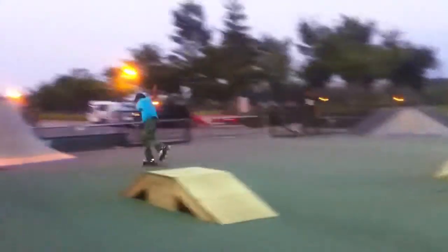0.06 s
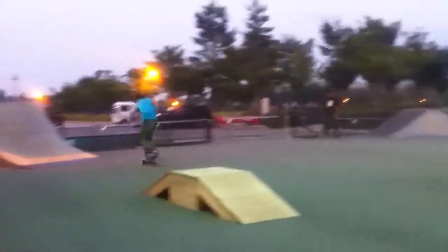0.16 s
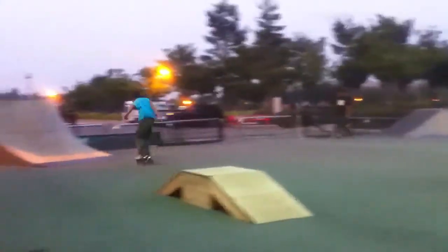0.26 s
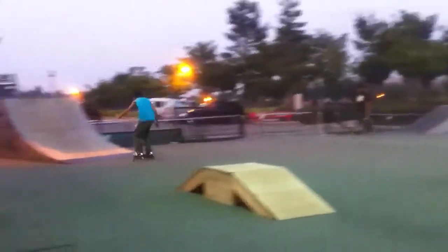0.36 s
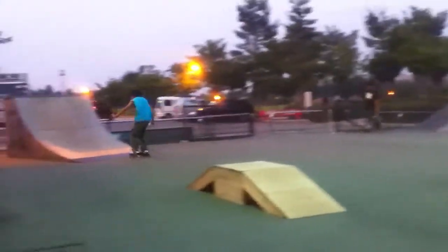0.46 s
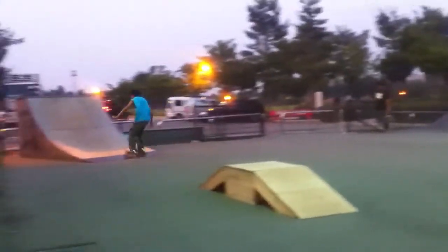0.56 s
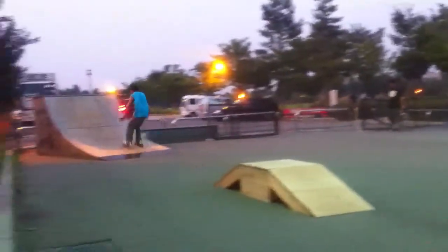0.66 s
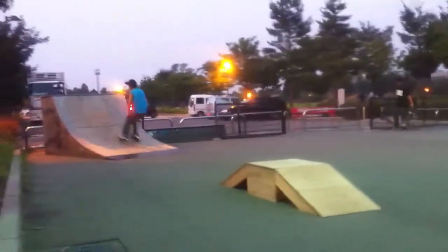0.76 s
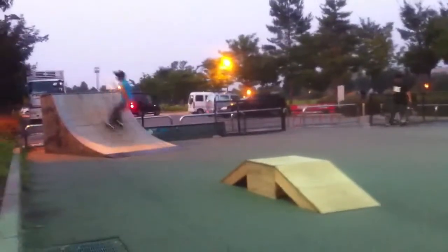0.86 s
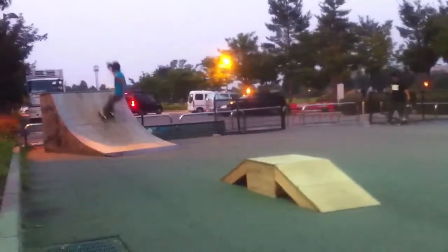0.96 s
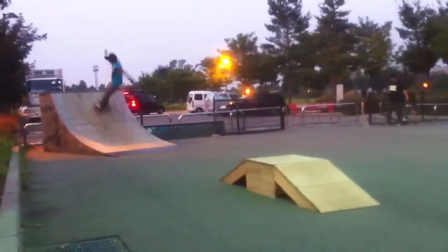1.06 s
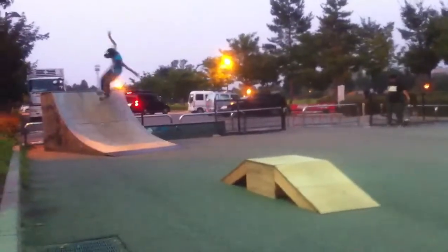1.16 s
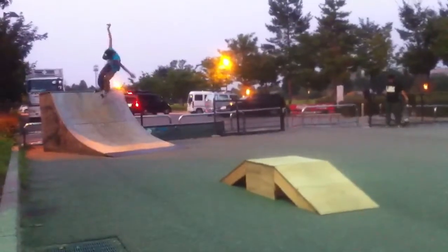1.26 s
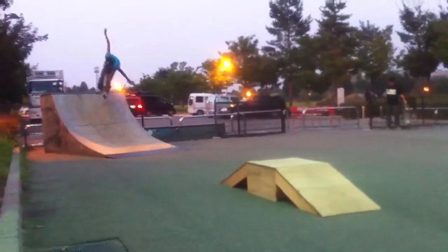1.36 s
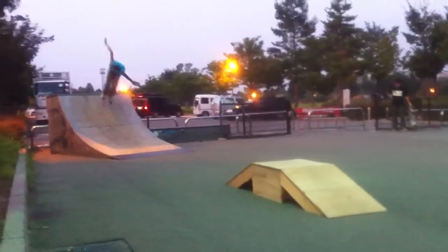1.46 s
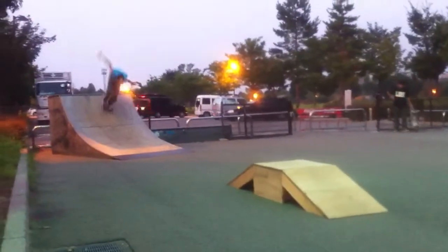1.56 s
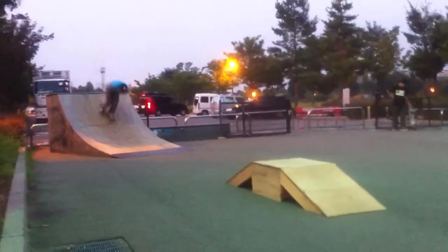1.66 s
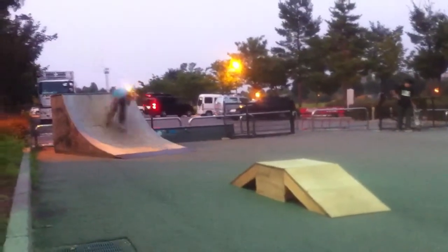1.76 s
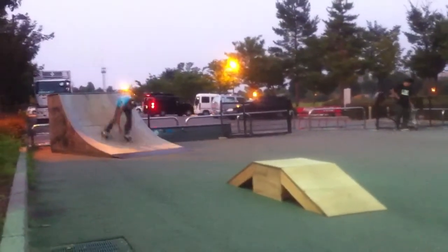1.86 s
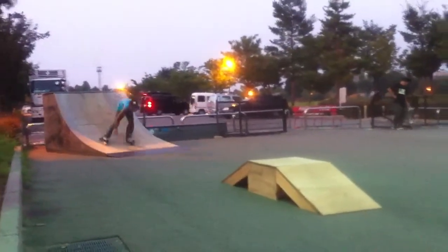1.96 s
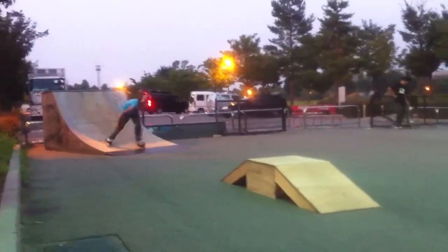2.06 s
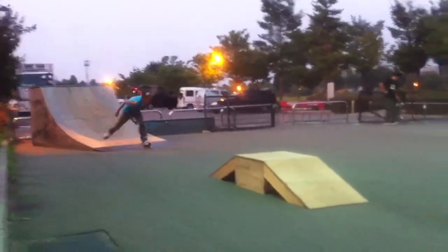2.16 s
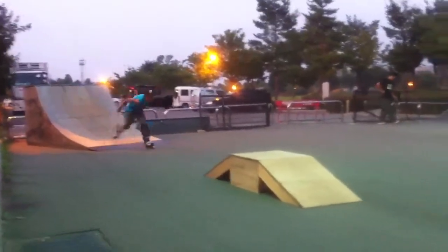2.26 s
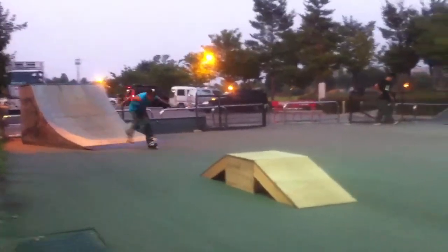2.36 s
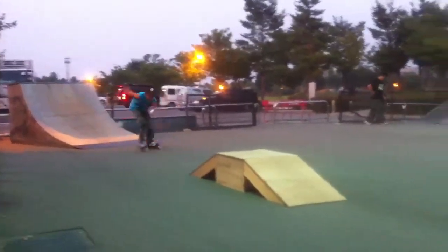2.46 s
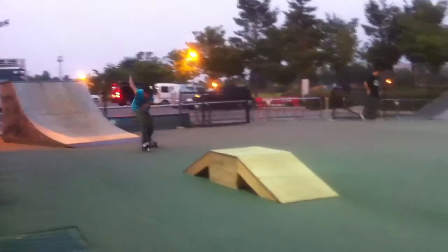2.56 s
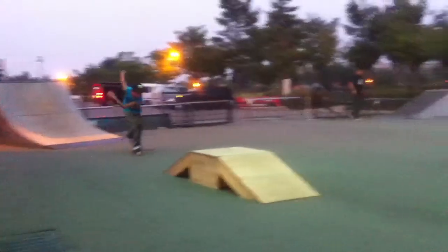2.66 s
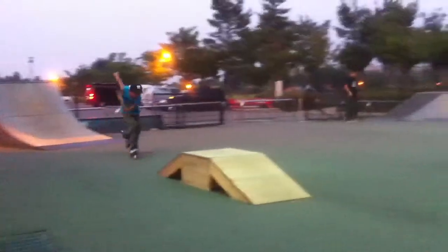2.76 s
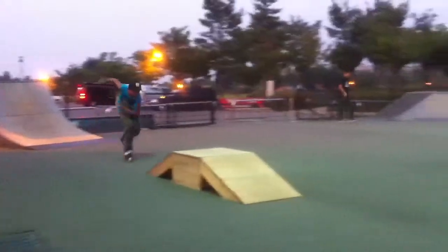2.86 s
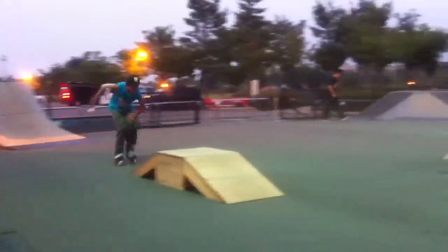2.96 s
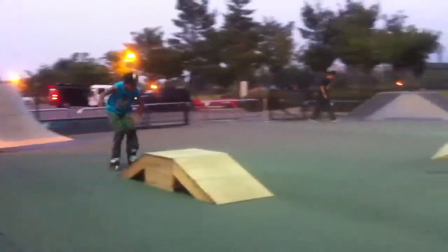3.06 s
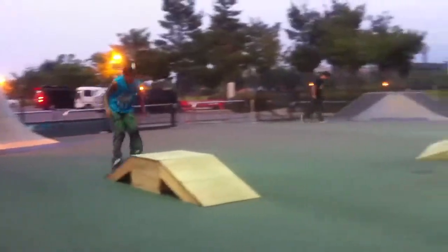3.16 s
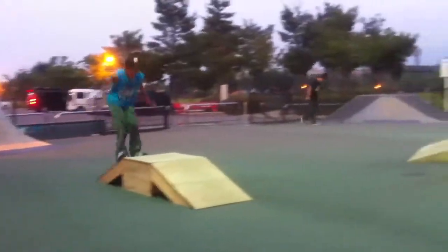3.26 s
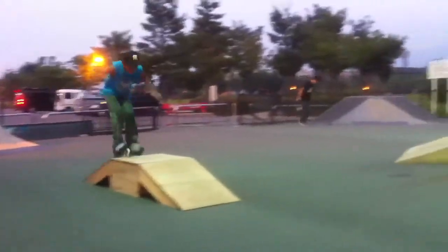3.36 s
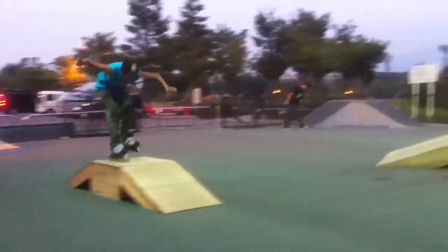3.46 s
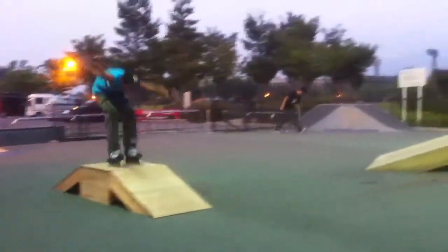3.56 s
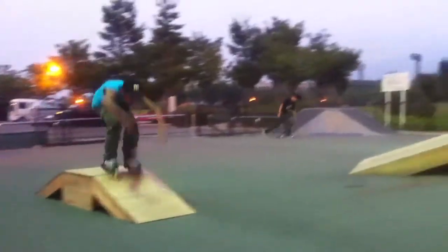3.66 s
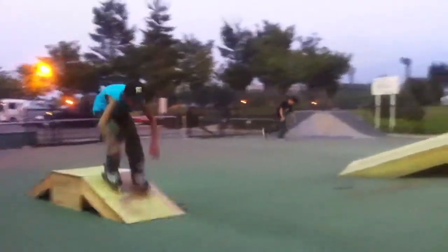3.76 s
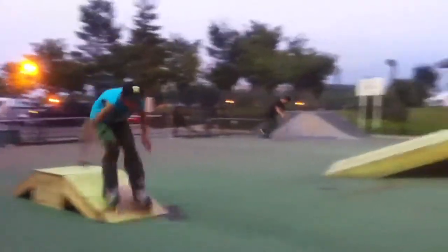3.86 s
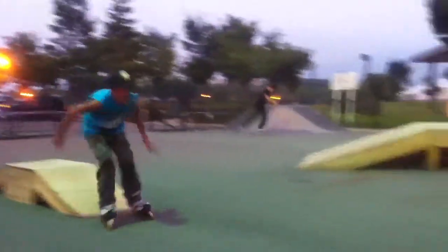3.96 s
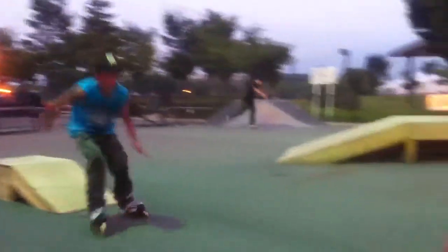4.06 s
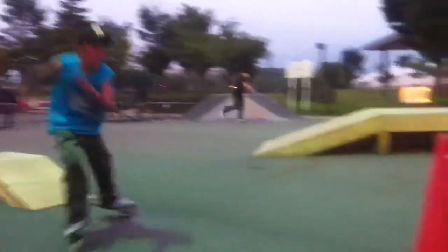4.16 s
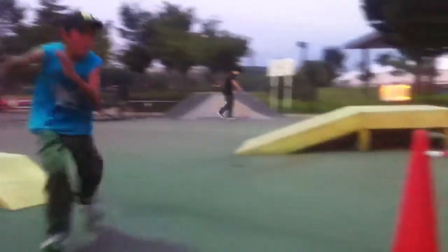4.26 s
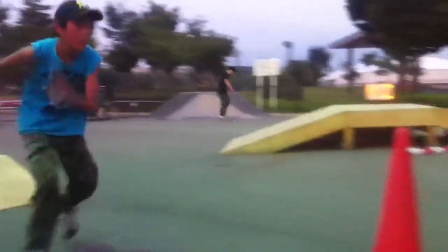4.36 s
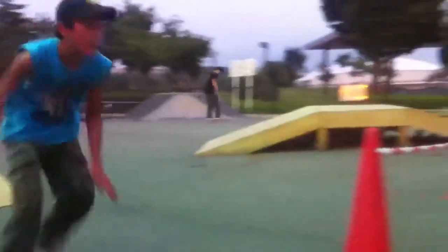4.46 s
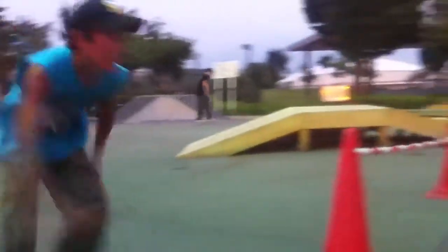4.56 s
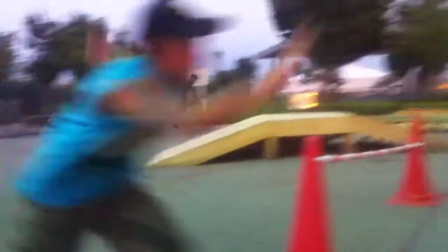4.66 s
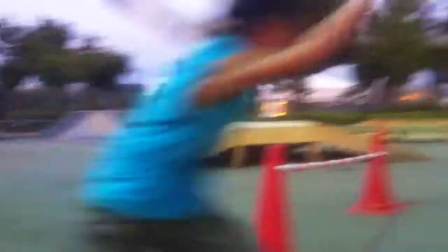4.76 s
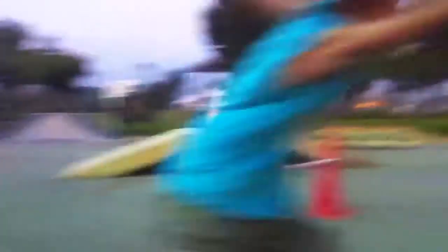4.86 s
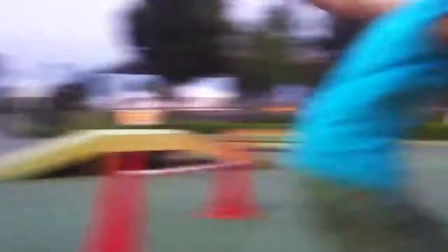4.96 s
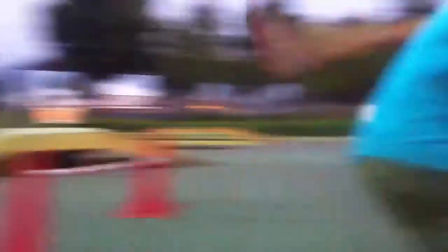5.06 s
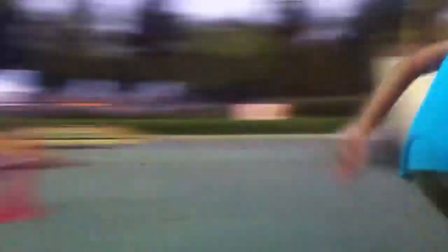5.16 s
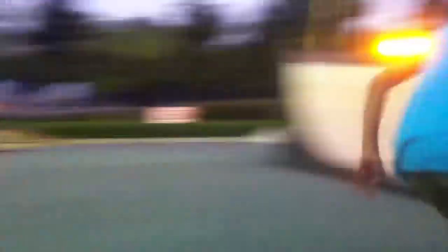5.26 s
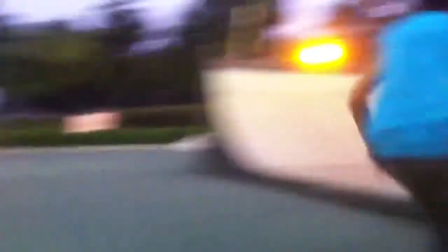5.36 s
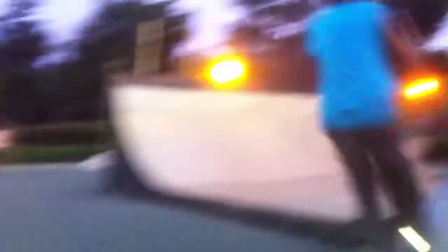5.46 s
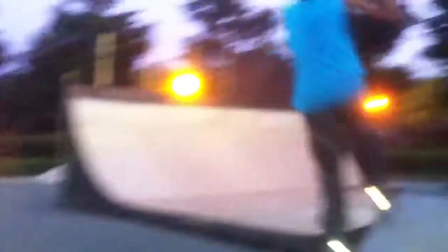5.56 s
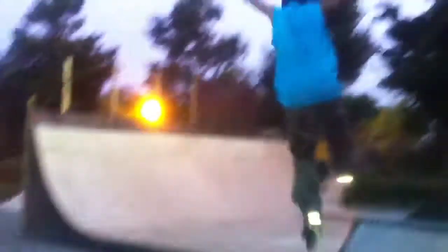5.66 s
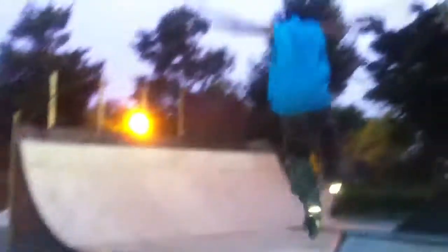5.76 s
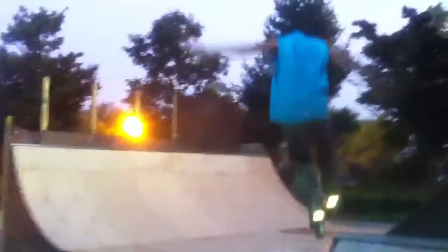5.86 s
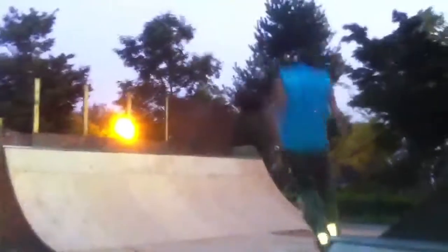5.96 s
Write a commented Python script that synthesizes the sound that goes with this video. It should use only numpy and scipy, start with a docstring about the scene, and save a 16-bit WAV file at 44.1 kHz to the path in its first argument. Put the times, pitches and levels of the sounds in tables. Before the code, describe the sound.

Hard skate wheels roar and clack through an outdoor skate park, drumming over plywood and clanging on steel plates, with faint traffic behind.

```python
"""Distant traffic hums as a skater rolls in, hard wheels roaring and hissing on an outdoor park's asphalt.
At 0.6 s they clash over a steel foot plate and drum up a far, hollow quarter pipe; the skater lands
back on it at 1.7 s and skids off. At 3.2 s the skates thump onto a plywood box and drum across it.
They clack close past the microphone near 5 s, then hit a second ramp's steel plate at 5.3 s;
that ramp booms and rattles while the wheels scrape to brake."""
import sys
import numpy as np
from scipy import signal
from scipy.fft import rfft, irfft
from scipy.io import wavfile

SR = 44100
rng = np.random.default_rng(int(sys.argv[2]) if len(sys.argv) > 2 else 0)


def file_out(sig):
    """Save sig as 16-bit WAV at sys.argv[1]."""
    # one column per channel
    cols = np.atleast_2d(sig).T
    # limit, then scale
    lim = np.clip(cols, -1, 1)
    pcm = np.round(lim * 32767).astype(np.int16)
    wavfile.write(sys.argv[1], SR, pcm)


N = 264688
TIME = np.arange(N) / SR


def amp(db):
    """Decibels to gain."""
    return 10 ** (np.asarray(db) / 20)


def unit(x):
    """Scales to rms 1."""
    return x / np.sqrt(np.mean(x ** 2) + 1e-20)


def read(points, hz):
    """Reads a curve on a log-frequency axis."""
    f, value = np.transpose(points)
    return np.interp(np.log(hz + 1), np.log(f + 1), value)


def fader(rows):
    """Gain over time from a curve in dB."""
    return amp(np.interp(TIME, *np.transpose(rows)))


def held(start, end, attack_s, fade_db_per_s):
    """An envelope that rises from start, holds until end and then fades."""
    return np.clip((TIME - start) / attack_s, 0, 1) * amp(-fade_db_per_s * np.maximum(TIME - end, 0))


def add(mix, s, sound):
    """Mixes a sound in at time s."""
    part = mix[max(round(s * SR), 0):][:len(sound)]
    part += sound[:len(part)]


def colour(x, spectrum, peaks=(), ripple_db=0):
    """An EQ curve that rolls off past its ends, with set resonances and a ripple of lesser ones; rms 1."""
    hz = np.fft.rfftfreq(len(x), 1 / SR) + 1
    octaves_out = abs(np.log2(hz / np.clip(hz, spectrum[0][0], spectrum[-1][0])))
    db = read(spectrum, hz) - 20 * octaves_out
    mode_hz = np.arange(500, 16000, 75)
    db += ripple_db * np.interp(hz, mode_hz, rng.standard_normal(len(mode_hz)), left=0)
    for centre, width, peak_db in peaks:
        db += peak_db / (1 + (2 * (hz - centre) / width) ** 2)
    return unit(irfft(rfft(x) * amp(db), len(x)))


def grains(per_s, spread_db):
    """A random train of tiny contacts; a positive spread hardens a few, a negative one softens them."""
    size = amp(spread_db * np.minimum(rng.exponential(1, N), 4))
    return size * rng.standard_normal(N) * (rng.random(N) < per_s / SR)


def waver(hz, depth_db):
    """A random gain that moves up to hz times a second."""
    slow = np.fft.rfftfreq(N, 1 / SR) < hz
    return amp(depth_db * unit(irfft(rfft(rng.standard_normal(N)) * slow, N)))


def strike(spectra, dbs, t60, rise_s, crack, crack_s, bass_ring=1, peaks=()):
    """A blow on crowded modes: a short crack, then three bands die away, the lowest on its own time."""
    t = TIME[:2 ** 15]
    out = np.zeros(len(t))
    attack = (1 + crack * np.exp(-t / crack_s)) * (1 - np.exp(-t / rise_s))
    for spectrum, db, share in zip(spectra, dbs, (bass_ring, 1, 1)):
        fade = attack * amp(db - 60 * t / max(t60 * share, .005))
        modes = fade * colour(rng.standard_normal(len(t)), spectrum, peaks, ripple_db=3.5)
        out += unit(modes) * np.sqrt(np.mean(fade ** 2))  # the force of the blow sets its energy
    return out


def ring(blows, modes, rise_s):
    """Each blow rings the same set of modes at its own pitch."""
    out, t = np.zeros(N), TIME[:2 ** 14]
    for s, db, hz, t60 in blows:
        tone = np.zeros(len(t))
        for k, (ratio, mode_db, share) in enumerate(modes):
            fade = amp(db + mode_db - 60 * t / (t60 * share))
            tone += (-1) ** k * fade * np.sin(2 * np.pi * hz * ratio * t)
        add(out, s, tone * (1 - np.exp(-t / rise_s)))
    return out


# EQ of the road wash: f/Hz, level/dB
ROAD_EQ = [(15, -58), (25, -43), (59, -26), (135, -2.5), (213, -0.5), (326, -7.5), (450, -7.5), (879, -7),
           (1150, -13), (1720, -17), (2630, -25), (3260, -24), (9270, -31), (15000, -34.5)]
# fader moves on a distant engine: t/s, level/dB
ENGINE_FADER = [(0, -59.5), (1, -64), (1.45, -49), (2.7, -54.5), (3.1, -72), (6, -63)]

def traffic(engine_hz=212.3):
    """The background bed: a far road's wash and one engine's low, wavering hum."""
    wash = amp(-52) * colour(rng.standard_normal(N), ROAD_EQ) * waver(hz=9.8, depth_db=-2.2)
    hum = fader(ENGINE_FADER) * np.sin(2 * np.pi * engine_hz * TIME) * waver(hz=10, depth_db=0.5)
    return wash + hum


# the park's reverb time: f/Hz, t60/s
PARK_DECAY = [(150, 0.3), (1000, 0.3), (5000, 0.52), (14000, 0.098)]

def park_echoes(x, echoes_per_s=1500, predelay_s=0.012):
    """Thin echoes from ramps, fences and trees; the top end dies first."""
    n = 2 ** 15
    taps = rng.standard_normal(n) * (rng.random(n) < echoes_per_s / SR) * (TIME[:n] > predelay_s)
    hz, t, bands = signal.stft(taps, SR, nperseg=256)
    tail = signal.istft(bands * amp(-60 * t / read(PARK_DECAY, hz)[:, None]), SR, nperseg=256)[1]
    return signal.fftconvolve(x, tail / np.linalg.norm(tail))[:N]


# EQs of a hollow deck's drumming and its sheets' rattle: f/Hz, level/dB
DRUM_EQ = [(30, -20), (80, -22.5), (120, -11), (170, 1), (230, -2.5), (330, -5.5), (500, -18), (1000, -23),
           (2500, -47)]
RATTLE_EQ = [(250, -25), (450, -13.5), (650, -1.5), (850, -1), (1300, -6.5), (2200, -10), (4000, -25.5),
             (9000, -25)]
# panel resonances of the far ramp and box: f/Hz, width/Hz, boost/dB
FAR_PANEL_PEAKS = [(147, 47, 4.5), (168.7, 2.2, 0.5), (199, 10.5, 8.5)]
# up the ramp, down it, over the box: start t/s, end t/s, entry level/dB, exit level/dB, deck mode f/Hz
DECK_RIDES = [(0.626, 1.103, -49, -43, 97), (1.76, 2.329, -39, -49.5, 89), (3.298, 4.057, -51, -37, 165)]

def far_decks(mode_width_hz=31, mode_boost_db=6.5):
    """Rolling wheels drum on the hollow far ramp and box, and rattle their sheets."""
    out = np.zeros(N)
    rattle = colour(grains(per_s=900, spread_db=0.5), RATTLE_EQ, ripple_db=5.5)
    for start, end, entry_db, exit_db, deck_hz in DECK_RIDES:
        peaks = FAR_PANEL_PEAKS + [(deck_hz, mode_width_hz, mode_boost_db)]
        drum = colour(grains(per_s=2000, spread_db=1.0), DRUM_EQ, peaks)
        riding = held(start, end, attack_s=0.041, fade_db_per_s=192)
        out += fader([(start, entry_db), (end, exit_db)]) * riding * (amp(3) * drum + amp(-18) * rattle)
    return out


# EQs of a steel plate's low and middle layers: f/Hz, level/dB
BODY_EQ = [(60, -37), (180, 9), (500, 3), (950, 2), (1800, -5), (3500, -13.5)]
CLANG_EQ = [(1100, -27), (2200, 6.5), (3300, 3), (5200, 6), (7000, -4.5), (11000, -15)]

def clatter(hits, sizzle_eq, peaks, body_db, sizzle_db, rise_s, chatter_db):
    """Wheels and frames clash and chatter on a ramp's foot; a bright hit trades body for sizzle."""
    out = np.zeros(N)
    layers = (BODY_EQ, CLANG_EQ, sizzle_eq)
    for s, db, bright_db, t60 in hits:
        dbs = (db + body_db - bright_db, db, db + sizzle_db + bright_db)
        add(out, s, strike(layers, dbs, t60, rise_s, crack=0.14, crack_s=0.005, peaks=peaks))
    return out * waver(hz=240, depth_db=chatter_db)


# EQ of the far plate's top layer: f/Hz, level/dB
FAR_SIZZLE_EQ = [(4500, -19), (7000, 0), (9500, -6.5), (12500, -12), (16000, -27)]
# its steel resonances: f/Hz, width/Hz, boost/dB
FAR_STEEL_PEAKS = [(970, 48, 5), (2200, 130, 1), (3120, 300, 13), (3730, 140, 14), (4600, 300, 10.5),
                   (5120, 280, 9.5)]
# wheel hits on it: t/s, level/dB, brightness/dB, t60/s
FAR_HITS = [(.63, -29.5, -0.5, 0.11), (.674, -43, -9, .1), (.752, -36.5, 1, .092), (.781, -44, -2, 0.072)]

def far_plate():
    """Wheels clang over the steel plate at the foot of the far ramp."""
    return amp(-2) * clatter(FAR_HITS, FAR_SIZZLE_EQ, FAR_STEEL_PEAKS,
                             body_db=-3.5, sizzle_db=-9.5, rise_s=0.00044, chatter_db=1.0)


def skid(start_s=2.19, slip_every_s=0.019, loss_db=4, t60=0.15):
    """A skate skids sideways off the far ramp's foot, gripping and slipping, weaker each time."""
    slips = [(start_s + k * slip_every_s, -28 - k * loss_db, 0, t60) for k in range(4)]
    return clatter(slips, FAR_SIZZLE_EQ, (), body_db=0.5, sizzle_db=-8.5, rise_s=0.0035, chatter_db=1.5)


# a plywood panel's modes: ratio to main mode, level/dB, share of ring time
PLYWOOD_MODES = [(.54, -11, 1.17), (0.761, -7, 1.5), (1.002, 1.5, 1.25), (1.27, -2, 0.71),
                 (1.658, -8, 1.42), (2.05, -7.5, 0.4), (2.9, -25, 1.3), (4.1, -11.5, 0.2)]
# landings: t/s, thump level/dB, main mode f/Hz, panel t60/s, clack level/dB, clack brightness/dB
LANDINGS = [(1.006, -28, 173, 0.11, -53, -6), (1.058, -28.5, 202, 0.15, -51, -2),
            (1.684, -12, 267.7, 0.068, -29, -6.5), (1.7055, -7, 306, 0.044, -26.5, -6.5),
            (1.724, -18, 241, 0.088, -38, -4), (2.249, -26, 206, 0.1, -55, -5),
            (3.249, -13.5, 211.3, 0.18, -40.5, -12), (3.273, -12, 203.6, 0.066, -48, -8),
            (3.296, -22, 191.5, 0.16, -38.5, -14.5), (3.336, -18, 211, 0.062, -58, -17),
            (3.533, -31.5, 213, 0.083, -57.5, -6), (3.658, -20, 285, 0.055, -44.5, -12),
            (3.668, -11.5, 200, 0.069, -37.5, -4), (4.044, -18.5, 181, 0.094, -33.5, -9),
            (4.061, -15.5, 173.6, 0.11, -56, -8)]

def plywood_thumps(low_cut_hz=95):
    """Each landing rings the panel under it; the deepest bass is cut away."""
    panels = ring([row[:4] for row in LANDINGS], PLYWOOD_MODES, rise_s=0.00092)
    low_cut = signal.butter(3, low_cut_hz, "highpass", fs=SR, output="sos")
    return amp(-3.5) * signal.sosfilt(low_cut, panels)


# a wheel frame's modes: ratio to main mode, level/dB, share of ring time
FRAME_MODES = [(1, 2, 0.94), (1.2, -18, 0.44), (1.72, -9.5, 1), (2.08, -41, 1), (2.35, -22, 1)]
# the hardest jolts: t/s, level/dB, main mode f/Hz, t60/s
FRAME_JOLTS = [(2.616, -34, 1750, 0.022), (3.298, -29.5, 995, 0.051), (4.045, -37, 1610, 0.03),
               (4.1435, -17, 957, 0.028), (4.734, -45, 1680, .04), (5.177, -14.5, 2260, 0.012)]

def wheel_frames(wobble_s=3.718, turn_s=0.046, knock_hz=1137, t60=0.074):
    """Hard jolts ring a wheel's frame; on the way down the box a wheel knocks it once a turn."""
    wobble = [(wobble_s + k * turn_s, -40.5, knock_hz * rng.uniform(0.87, 1.05), t60) for k in range(5)]
    return ring(FRAME_JOLTS + wobble, FRAME_MODES, rise_s=0.00049)


# EQs of a skate's low, middle and top layers: f/Hz, level/dB
KNOCK_EQ = [(120, -40), (280, 6.5), (430, -6.5), (600, -4), (1000, -8.5), (1500, -24.5), (3000, -45)]
CLACK_EQ = [(700, -14), (1600, 13.5), (2400, 6.5), (3500, 4), (6000, -5), (10000, -25.5)]
TICK_EQ = [(3000, -10), (6000, -2), (10000, 0), (13000, -2.5), (16000, -11)]
# skates set down or crossing a joint: t/s, level/dB, brightness/dB, t60/s
STEPS = [(.043, -45, -1, 0.033), (.342, -43, -2.5, .22), (.412, -44, -3.5, 0.28), (1.081, -47, 1.5, 0.065),
         (1.141, -51.5, 3.5, 0.058), (1.455, -51.5, 7.5, 0.04), (1.555, -55.5, 2.5, 0.32),
         (2.457, -56, 4, 0.2), (2.615, -38, -5, 0.046), (3.107, -41, -9, .093), (3.714, -42, -3, 0.12),
         (3.771, -42, -5, 0.068), (3.968, -41.5, -2.5, 0.27), (4.013, -34.5, -8, 0.049),
         (4.142, -43.5, 9, 0.25), (4.733, -36, -5, 0.19), (5.176, -33.5, -5.5, 0.21)]

def skate_clacks(landing_t60=0.079):
    """Wheels, frames and boot shells clack at steps, joints and landings, where wood damps their ring."""
    out = np.zeros(N)
    layers = (KNOCK_EQ, CLACK_EQ, TICK_EQ)
    landings = [(s, db, bright_db, landing_t60) for s, *_, db, bright_db in LANDINGS]
    for s, db, bright_db, t60 in STEPS + landings:
        dbs = (db - bright_db, db, db + bright_db)  # a bright clack trades knock for tick
        add(out, s, strike(layers, dbs, t60, rise_s=0.00018, crack=0.89, crack_s=0.0016, bass_ring=1.09))
    return amp(-4.5) * out


# EQs of the three rolling layers: f/Hz, level/dB
ROAR_EQ = [(50, -53), (110, -15.5), (190, 0.5), (330, -5.5), (600, -4), (950, -9.5), (1300, -15),
           (1900, -12.5), (2600, -21), (4000, -22)]
GRIT_EQ = [(1500, -22), (2400, 6), (3600, 1.5), (5500, 0.5), (8000, -5), (12000, -14)]
BEARING_EQ = [(4500, -11.5), (7000, -5.5), (10300, -3.5), (13000, -5), (16000, -8)]
# wheel and bearing resonances: f/Hz, width/Hz, boost/dB
WHIRR_PEAKS = [(1680, 400, 4.5), (10000, 1100, 2.5)]
# the skater's path: t/s, distance from the microphone/m
SKATER_PATH = [(0, 13), (1.3, 8.1), (2.5, 18.8), (3.3, 8.2), (4.0, 4.9), (4.5, 4), (4.9, 1.8), (5.3, 2.04),
               (6.0, 6.9)]
# wheels down, between jumps and turns: start t/s, end t/s, load level/dB, extra grit/dB
WHEELS_DOWN = [(-.05, .34, -7.5, 6.5), (0.324, 0.63, 1, -0.5), (0.615, 1.09, 2, 3), (1.7, 2.21, 4, 3.5),
               (2.414, 3.285, 0, -4), (3.744, 4.196, 3, 2.5), (4.2, 5.306, -0.5, -3),
               (5.837, 6.05, -10, -21)]

def wheels_on_asphalt():
    """Stones in the surface shake the loaded wheels and the bearings hiss; all swell as the skater nears."""
    distance = np.interp(TIME, *np.transpose(SKATER_PATH))
    load, grinding = np.zeros((2, N))
    for start, end, load_db, grit_db in WHEELS_DOWN:
        # wheels take the load quickly and spin down once lifted
        contact = amp(load_db) * held(start, end, attack_s=0.028, fade_db_per_s=108)
        load = np.maximum(load, contact)
        grinding = np.maximum(grinding, amp(grit_db) * contact)
    roar = colour(grains(per_s=6000, spread_db=-0.7), ROAR_EQ, WHIRR_PEAKS)
    roar *= waver(hz=42, depth_db=1.1) * load / distance
    grit = colour(grains(per_s=3500, spread_db=-2.2), GRIT_EQ, ripple_db=1.0)
    grit *= waver(hz=44.8, depth_db=3.0) * grinding / distance ** 0.75
    hiss = colour(rng.standard_normal(N), BEARING_EQ, WHIRR_PEAKS, ripple_db=0.8)
    hiss *= waver(hz=45, depth_db=1.66) * load / distance ** 1.07
    return amp(-35) * roar + amp(-53.5) * grit + amp(-45.5) * hiss


# EQ of the near plate's top layer: f/Hz, level/dB
NEAR_SIZZLE_EQ = [(4500, -17), (7700, -3), (9000, 0.5), (11500, 4), (13300, 1), (16000, -16)]
# its steel resonances: f/Hz, width/Hz, boost/dB
NEAR_STEEL_PEAKS = [(640, 40, -2), (846, 83, 11.5), (5830, 670, 4.5), (7870, 120, 7.5), (9400, 40, -9),
                    (10400, 40, 6), (11100, 57, 1), (11900, 40, 2), (12620, 46, 9)]
# wheel hits on it: t/s, level/dB, brightness/dB, t60/s
NEAR_HITS = [(5.305, -21, 3, 0.16), (5.401, -28.5, -2.5, 0.14), (5.438, -26.5, 3, 0.21),
             (5.482, -21, 5, 0.49), (5.507, -22, -0.5, 0.31), (5.564, -28, -1.5, 0.44),
             (5.682, -37.5, 6.5, 0.18), (5.789, -39.5, -3.5, 0.13)]

def near_plate():
    """Wheels crash over the near ramp's steel foot plate, full-bodied and bright."""
    return amp(-3.5) * clatter(NEAR_HITS, NEAR_SIZZLE_EQ, NEAR_STEEL_PEAKS,
                               body_db=4.5, sizzle_db=3, rise_s=0.0013, chatter_db=0.86)


# the near ramp's panel resonances: f/Hz, width/Hz, boost/dB
NEAR_PANEL_PEAKS = [(173, 38, 8.5), (242.3, 17, 10.5), (320, 33, 6.5), (457.5, 41, 15), (540, 72, 7),
                    (800, 28, -0.5), (1146, 20, 10.5)]
# EQ of braking wheels: f/Hz, level/dB
SCRAPE_EQ = [(1500, 6), (2500, -0.5), (4500, -12), (6000, -5), (9000, -7), (11500, 1.5), (13500, -4),
             (16000, -8)]

def near_ramp(entry_s=5.31, brake_s=5.38):
    """The ramp rattles from the first touch, booms as the weight comes on and is scraped by braking."""
    drum = colour(grains(per_s=3500, spread_db=2.0), DRUM_EQ, NEAR_PANEL_PEAKS)
    drum *= held(entry_s, entry_s + 0.137, attack_s=0.1, fade_db_per_s=63)
    rattle = colour(grains(per_s=2500, spread_db=2.8), RATTLE_EQ, NEAR_PANEL_PEAKS, ripple_db=3.5)
    rattle *= held(entry_s, entry_s + 0.2569, attack_s=0.0069, fade_db_per_s=73)
    scrape = colour(grains(per_s=15000, spread_db=7.0), SCRAPE_EQ, ripple_db=3.5)
    scrape *= held(brake_s, brake_s + 0.22, attack_s=0.11, fade_db_per_s=135)
    return amp(-16) * drum + amp(-26.5) * rattle + amp(-26) * scrape


def scene():
    """The mono mix: impacts feed the park's echoes; the rolling and the traffic stay dry."""
    impacts = plywood_thumps() + wheel_frames() + skate_clacks() + far_plate() + skid() + near_plate()
    echoes = amp(-14) * park_echoes(impacts)
    rolling = wheels_on_asphalt() + far_decks() + near_ramp()
    return (impacts + echoes + rolling + traffic())[None]


def record(dry, low_cut_hz=45, high_cut_hz=15950):
    """A small microphone loses the deepest bass; a steep high cut limits the top end."""
    thinned = signal.sosfilt(signal.butter(1, low_cut_hz, "highpass", fs=SR, output="sos"), dry)
    high_cut = signal.firwin(511, high_cut_hz, window=("kaiser", 9), fs=SR)
    return signal.oaconvolve(thinned, high_cut[None], "same")


dry = scene()
out = record(dry)
file_out(out)
```